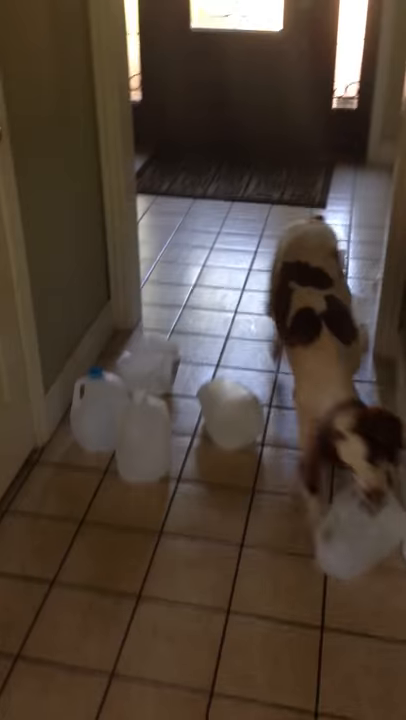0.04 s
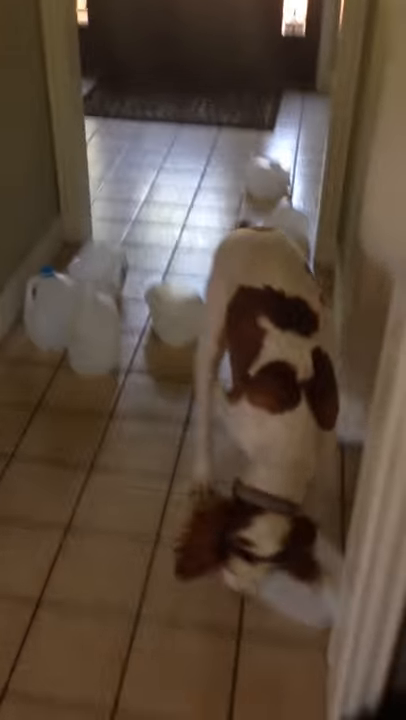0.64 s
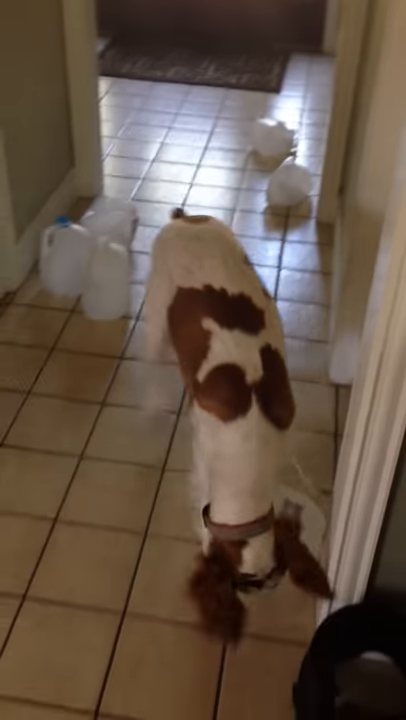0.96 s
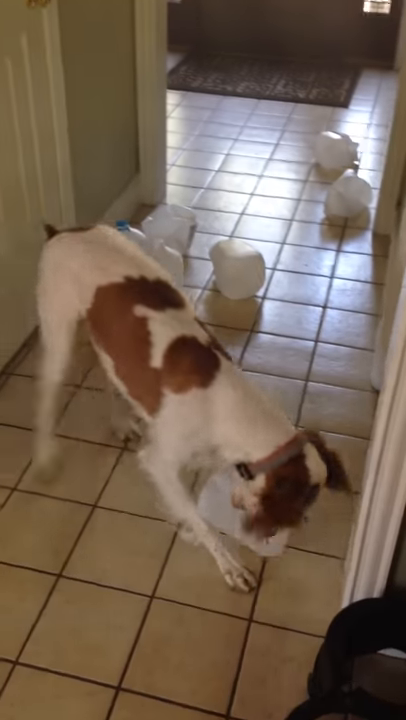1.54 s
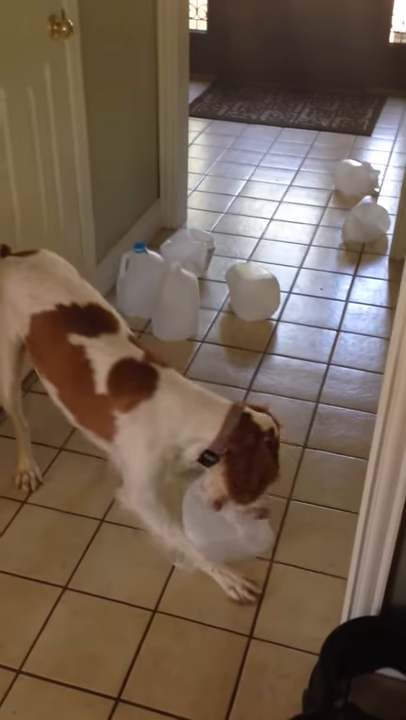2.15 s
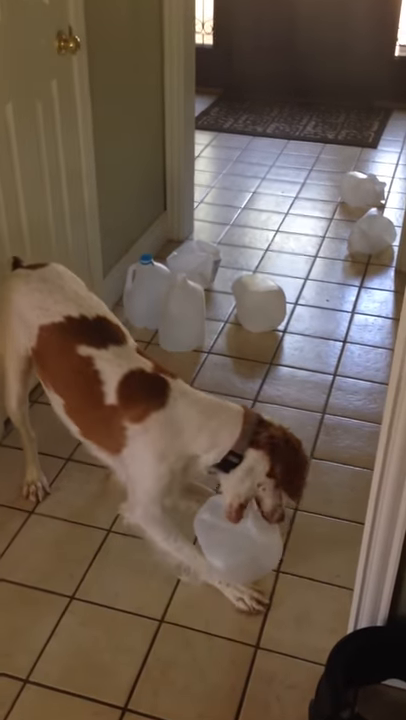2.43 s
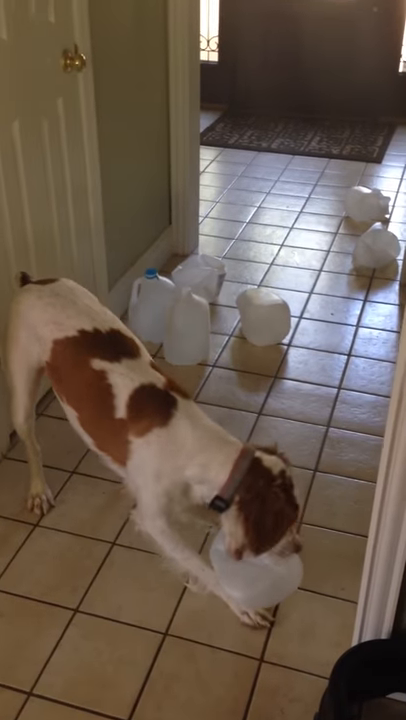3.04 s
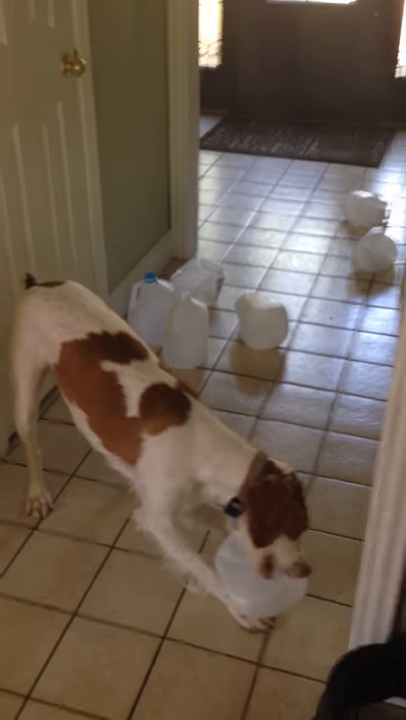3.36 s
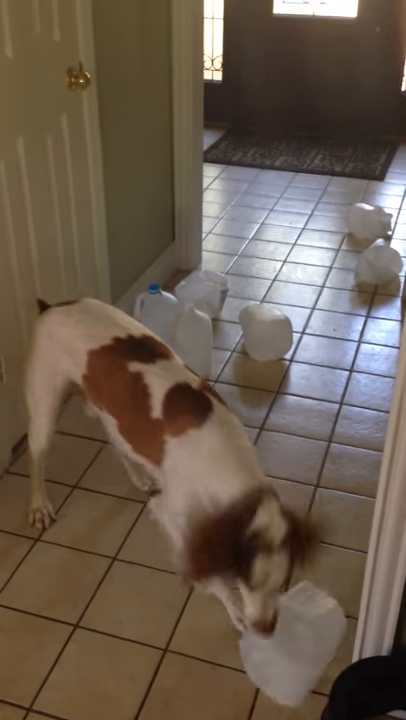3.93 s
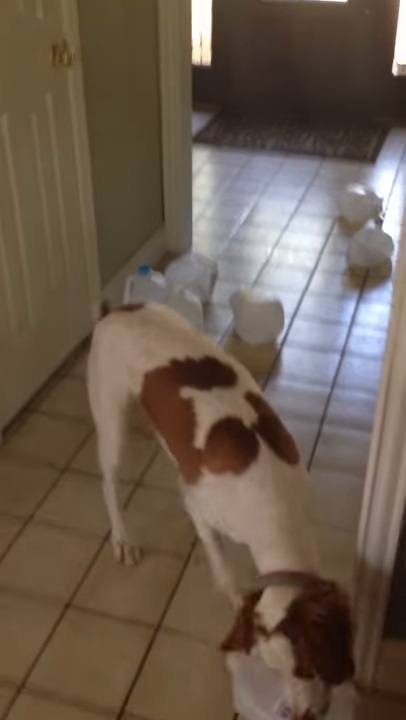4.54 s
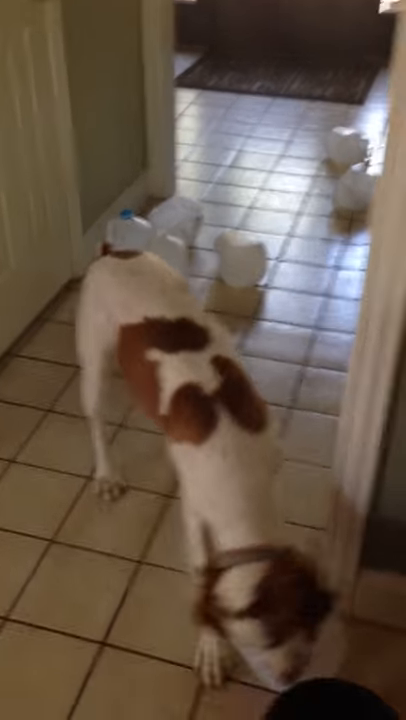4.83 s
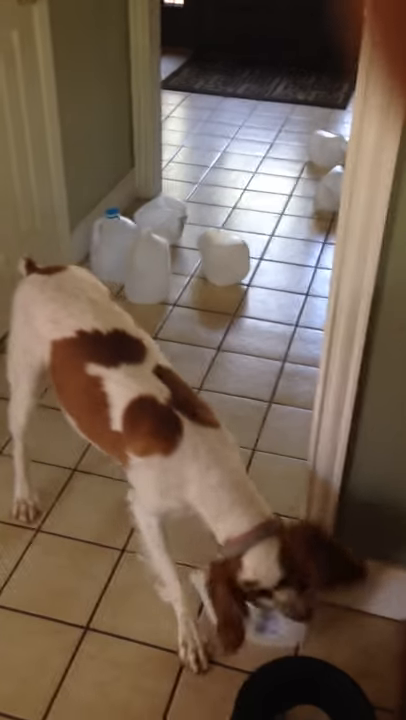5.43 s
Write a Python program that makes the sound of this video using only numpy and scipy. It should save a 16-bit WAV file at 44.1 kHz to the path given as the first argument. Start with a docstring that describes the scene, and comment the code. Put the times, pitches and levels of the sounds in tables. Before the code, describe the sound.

An empty plastic jug knocks, slides and buckles on tile as a dog pushes it around, claws ticking faintly in an echoing hallway.

```python
"""An empty plastic milk jug is nosed, pawed and chewed along a tiled hallway by a dog.
The jug thumps hollowly, clacks on floor and wall, pops where its side buckles, groans under the
wet muzzle, and judders and hisses as it slides. Claws tick on the tiles; the hard hallway rings
after every blow, over a low indoor hum."""
import sys
import numpy as np
from scipy import signal
from scipy.fft import rfft, irfft, next_fast_len
from scipy.io import wavfile
from scipy.ndimage import uniform_filter1d

SR = 44100
rng = np.random.default_rng(int(sys.argv[2]) if len(sys.argv) > 2 else 0)


def inscribe(sig):
    """Save sig as 16-bit PCM at rate SR to the path in sys.argv[1].

    A 1-D sig is mono; a 2-D sig holds one channel per row.
    Samples are clipped to [-1, 1] before scaling.
    """
    pcm = np.round(np.clip(np.atleast_2d(sig).T, -1, 1) * 32767)
    wavfile.write(sys.argv[1], SR, pcm.astype(np.int16))


N = 246519


def amp(db):
    """Decibels to gain."""
    return 10 ** (np.asarray(db) / 20)


def unit(x):
    """Scale to rms 1."""
    return x / np.sqrt(np.mean(x ** 2) + 1e-20)


def burst(x):
    """Scale a short sound to rms 1 over its loudest 10 ms."""
    return x / np.sqrt(uniform_filter1d(x ** 2, SR // 100).max() + 1e-20)


def along(points, hz):
    """Read a curve of (freq_hz, value) points on a log frequency axis."""
    freqs, values = np.transpose(points)
    return np.interp(np.log(hz + 1), np.log(freqs), values)


def coloured(x, spectrum, size=4096):
    """Minimum-phase EQ: colours a sound with no ringing ahead of its attack."""
    gain = amp(along(spectrum, np.fft.rfftfreq(size, 1 / SR)))
    cepstrum = irfft(np.log(gain))
    fold = 1 + np.sign(size // 2 - np.arange(size))
    fold[0] = 1
    impulse = irfft(np.exp(rfft(cepstrum * fold)))
    return signal.fftconvolve(x, impulse)[:len(x)]


def band(x, hz, kind):
    """Causal low-, band- or high-pass."""
    return signal.sosfilt(signal.butter(3, hz, kind, fs=SR, output="sos"), x)


def peaked(x, hz, q):
    """A broad resonance at hz."""
    return signal.lfilter(*signal.iirpeak(hz, q, SR), x)


def add(track, start_s, sound):
    """Mix a sound into the track at start_s."""
    part = track[max(round(start_s * SR), 0):][:len(sound)]
    part += sound[:len(part)]


def dying(t, t60):
    """A decay of 60 dB in t60 seconds."""
    return np.exp(-np.log(1000) * t / t60)


def stroke(start_s, length_s, attack_s, release_s, swell_db=0):
    """Envelope that rises, holds or swells for its length, then dies away."""
    age = np.arange(N) / SR - start_s
    onset = np.clip(age / attack_s, 0, 1)
    swell = amp(swell_db * (np.clip(age / length_s, 0, 1) - 1))
    return onset * swell * np.exp(-np.maximum(age - length_s, 0) / release_s)


def slips(per_s, spread_db):
    """Stick-slip: random tiny jerks of uneven size."""
    sizes = rng.choice([-1, 1], N) * amp(spread_db * np.clip(rng.standard_normal(N), -2, 2))
    return sizes * (rng.random(N) < per_s / SR)


def clicks(events, spectrum, t60, flutter_db):
    """Each click is a sudden snap and a short dense flutter, through one EQ."""
    out, t = np.zeros(N), np.arange(SR // 8) / SR
    for start_s, level_db in events:
        flutter = rng.standard_normal(len(t)) * dying(t, t60)
        snap = (t == 0) + amp(flutter_db) * flutter / np.linalg.norm(flutter)
        add(out, start_s, amp(level_db) * burst(coloured(snap, spectrum)))
    return out


def house_hum():
    """Room tone: a steady bed of low noise."""
    # hum EQ: freq_hz, level_db
    hum_eq = [(20, -72), (45, -3.5), (85, -1), (150, 4), (260, -2), (500, -25), (1000, -13.5),
              (3000, -23.5), (8000, -36.5), (15500, -42.5)]
    return amp(-47) * unit(coloured(rng.standard_normal(N), hum_eq))


def hallway(x, wet_db, walls_db):
    """Close walls throw back distinct echoes, then a diffuse ring; both change as the jug moves."""
    # the hallway's ring: freq_hz, t60_s
    ring_times = [(150, 0.46), (400, 0.38), (1000, 0.36), (2800, 0.41), (7000, 0.47), (15000, 0.28)]
    step_s, predelay_s, echo_span_s = 0.15, 0.004, 0.028
    out, t = np.zeros(N), np.arange(N) / SR
    for centre in np.arange(0, N / SR + step_s / 2, step_s):  # a fresh random reverb at each step
        hz, age, noise = signal.stft(rng.standard_normal(SR * 3 // 4), SR, nperseg=256)
        decay = amp(-60 * age / along(ring_times, hz)[:, None])
        tail = signal.istft(noise * decay, SR, nperseg=256)[1]
        echoes = np.zeros(len(tail))
        echoes[(rng.random(24) * echo_span_s * SR).astype(int)] = rng.standard_normal(24)
        impulse = amp(wet_db) * tail / np.linalg.norm(tail)
        impulse += amp(walls_db) * echoes / np.linalg.norm(echoes)
        near = abs(t - centre) < step_s
        crossfade = np.cos(np.pi / 2 * (t[near] - centre) / step_s)
        add(out, t[near][0] + predelay_s, signal.fftconvolve(x[near] * crossfade, impulse))
    return out


def claw_ticks():
    """Hard claws tap the tile: tiny, bright ticks."""
    # claw taps: start_s, level_db
    taps = [(0.941, -39), (1.6492, -41), (2.693, -50), (3.207, -43.5), (3.9168, -40), (3.9893, -44),
            (4.0494, -46.5), (4.1047, -40.5), (4.6433, -40)]
    # EQ of nail on tile: freq_hz, level_db
    nail_eq = [(500, -30), (2500, 4), (4500, 10.5), (8000, 0.5), (15500, -6)]
    return clicks(taps, nail_eq, t60=0.04, flutter_db=1)


def muzzle_groans():
    """The wet muzzle rubs a panel; the slips pile up in its main resonance until it groans."""
    # muzzle rubs: start_s, length_s, level_db
    rubs = [(3.304, 0.028, -36), (3.383, 0.06, -28.5)]
    panel_hz = 365
    press = sum(amp(db) * stroke(s, length, attack_s=0.015, release_s=0.017) for s, length, db in rubs)
    panel = peaked(slips(per_s=300, spread_db=0), panel_hz, q=5.3)
    return press * unit(peaked(panel, panel_hz, q=6.1))


def hiss_and_ticks():
    """Slips crowd into a gritty hiss that swells through a slide; the shortest bursts are ticks."""
    # hissing slides and brief bright ticks, the last being the edge of a pop: start_s, length_s, peak_db
    hisses = [(0.11, 0.0086, -32), (0.15, 0.12, -36.5), (0.287, 0.11, -40.5), (0.443, 0.0083, -29),
              (0.574, 0.011, -32), (0.646, 0.011, -33.5), (1.156, 0.086, -49.5), (1.371, 0.039, -49),
              (1.663, 0.04, -55.5), (2.206, 0.035, -46), (2.576, 0.022, -53.5), (3.779, 0.012, -34),
              (4.112, 0.029, -45), (4.169, 0.075, -36.5), (4.25, 0.11, -40), (4.345, 0.1, -34.5),
              (4.475, 0.04, -29.5), (4.715, 0.031, -45.5), (4.828, 0.06, -28), (4.997, 0.058, -37.5),
              (5.086, 0.322, -57), (5.461, 0.0092, -36)]
    # hiss EQ: freq_hz, level_db
    hiss_eq = [(400, -53), (1500, -2), (4000, 6), (7000, 1), (10000, -2.5), (15500, -11.5)]
    swells = [amp(db) * stroke(s, length, attack_s=0.0061, release_s=0.022, swell_db=6.5)
              for s, length, db in hisses]
    rub = unit(slips(per_s=7400, spread_db=0.5))
    grit = amp(-7) * unit(slips(per_s=520, spread_db=4.5))  # specks of dirt caught under the jug
    return np.max(swells, axis=0) * unit(coloured(rub + grit, hiss_eq))


def dragging():
    """Slow slips shake the hollow body, quick ones rasp the walls; the strongest push sets the level."""
    # the jug is dragged or gnawed: start_s, length_s, judder_db, scrape_db
    drags = [(0.081, 0.084, -21.5, -42), (0.203, 0.18, -35, -31), (0.364, 0.12, -38, -35),
             (0.552, 0.21, -28, -34.5), (0.8, 0.083, -28, -41.5), (0.926, 0.23, -36.5, -48.5),
             (1.2, 0.24, -40.5, -48), (1.546, 0.13, -37.5, -51), (1.843, 0.11, -44.5, -47),
             (2.247, 0.12, -45.5, -51), (2.584, 0.1, -40, -49.5), (3.007, 0.27, -40.5, -54.5),
             (3.156, 0.066, -34.5, -44.5), (3.265, 0.13, -34, -47), (3.402, 0.093, -41, -43),
             (3.678, 0.11, -43, -52), (3.798, 0.29, -45, -45.5), (3.975, 0.18, -37, -48.5),
             (4.204, 0.11, -31, -30), (4.334, 0.18, -42, -34.5), (4.429, 0.12, -28, -32.5),
             (4.617, 0.29, -45, -46.5), (4.824, 0.13, -33.5, -34), (5.0, 0.11, -45.5, -44.5),
             (5.355, 0.26, -46, -53)]
    # EQ of the shaking body: freq_hz, level_db
    judder_eq = [(50, -31), (110, -13.5), (150, 3), (200, 5), (270, 0), (380, 2), (450, -6), (560, -8.5),
                 (900, -14.5), (2000, -47.5)]
    # EQ of the rasping walls: freq_hz, level_db
    scrape_eq = [(250, -33), (600, 6.5), (1200, 4.5), (2200, 1), (4200, -8.5), (7000, -19), (15000, -34.5)]
    judder_gain, scrape_gain = amp(-51.5), 0  # the dog never quite lets go: a faint judder stays
    for start_s, length_s, judder_db, scrape_db in drags:
        push = stroke(start_s, length_s, attack_s=0.026, release_s=0.028)  # speeds up, coasts to rest
        judder_gain = np.maximum(judder_gain, amp(judder_db) * push)
        scrape_gain = np.maximum(scrape_gain, amp(scrape_db) * push)
    judder = unit(coloured(slips(per_s=380, spread_db=1), judder_eq))
    scrape = unit(coloured(slips(per_s=1500, spread_db=2), scrape_eq))
    return judder_gain * judder + scrape_gain * scrape


def buckle_pops():
    """The jug's side buckles and snaps with a sharp pop."""
    # buckles: start_s, level_db
    buckles = [(0.699, -16.5), (2.8288, -21.5), (4.243, -17.5), (5.47, -23.5)]
    # EQ of snapping plastic: freq_hz, level_db
    snap_eq = [(150, -23), (400, -2), (750, -12), (1300, -11.5), (1900, 0.5), (2700, -7), (3330, 0.5),
               (4400, -5.5), (6300, -9.5), (7600, -22), (15500, -48)]
    return clicks(buckles, snap_eq, t60=0.072, flutter_db=2)


def jug_blows(events, rise_s, crumple_t60, crumple_db):
    """Each blow rings the jug anew: the body thumps, the walls clack, edges crack, the floor thuds."""
    # modes of the air cavity and broad panels: pitch_hz, level_db, t60_s
    modes = [(152, 0, 0.12), (201, 4, 0.029), (237, -4, 0.025), (293, -6.5, 0.11), (363.7, -1.5, 0.088),
             (463, -4.5, 0.052), (570, -7, 0.0093), (780, -8.5, 0.1), (910, -25, 0.19), (1024, -16, 0.18),
             (1100, 1, 0.031), (1437, -1, 0.036), (1926, -12.5, 0.099), (2152, -16.5, 0.22)]
    thud_db, crack_db = -27.5, -10.5  # relative to the thump and to the clack
    out, t = np.zeros(N), np.arange(SR // 4) / SR
    contact = 1 - np.exp(-t / rise_s)  # the force builds as the plastic gives
    for start_s, thump_db, clack_db, thump_hz, clack_hz in events:
        detune = 1 + 0.0074 * rng.standard_normal()  # jaws and paws bend the panels
        ring = np.zeros(len(t))
        for hz, level_db, t60 in modes:
            gain = amp(level_db + 2 * rng.standard_normal())
            ring += gain * np.sin(2 * np.pi * (hz * detune * t + rng.random())) * dying(t, t60)
        blow = contact * (burst(ring) + amp(crumple_db) * crumple(t, crumple_t60))
        # the struck spot favours the modes near its own two pitches
        thump = burst(band(peaked(blow, thump_hz, q=3.73) * dying(t, 0.23), 810, "low"))
        clack = burst(band(blow + amp(6.5) * peaked(blow, clack_hz, q=4.5), [550, 2800], "band"))
        crack = burst(band(blow * dying(t, 0.11), 2770, "high"))
        thud = burst(band(rng.standard_normal(len(t)) * dying(t, 0.11), 79, "low"))
        add(out, start_s, amp(thump_db) * (thump + amp(thud_db) * thud))
        add(out, start_s, amp(clack_db) * (clack + amp(crack_db) * crack))
    return out


def crumple(t, t60):
    """The countless close modes of thin plastic blur into a burst of noise."""
    # EQ of thin plastic: freq_hz, level_db
    plastic_eq = [(60, -55), (150, -3), (400, 1), (650, -2.5), (1300, -3), (2400, -6), (4400, -14.5),
                  (6500, -28.5), (10000, -40), (15500, -67)]
    return burst(coloured(rng.standard_normal(len(t)) * dying(t, t60), plastic_eq))


def paw_bumps():
    """Soft paws stir the hollow body and barely wake the clack."""
    # paw hits: start_s, thump_db, thump_hz
    bumps = [(0.385, -23, 210), (0.971, -27.5, 197), (0.993, -23.5, 216), (1.02, -45, 205),
             (1.09, -25.5, 249), (1.364, -31.5, 332), (1.488, -18.5, 196), (1.93, -35.5, 361),
             (2.595, -25, 172), (2.69, -28.5, 386), (3.186, -30, 440), (3.205, -24.5, 237),
             (3.918, -33.5, 293), (4.003, -27, 219), (4.08, -28, 202), (4.523, -18, 278), (4.549, -22, 333),
             (4.644, -35, 300), (5.274, -33, 357), (5.346, -28, 273), (5.493, -23.5, 228)]
    clack_offset_db, clack_hz = -19.5, 710
    hits = [(s, db, db + clack_offset_db, hz, clack_hz) for s, db, hz in bumps]
    return jug_blows(hits, rise_s=0.00074, crumple_t60=0.046, crumple_db=8)


def muzzle_shoves():
    """The muzzle presses in and crumples the jug: blows with a soft attack."""
    # shoves: start_s, thump_db, clack_db, thump_hz, clack_hz
    shoves = [(0.086, -28, -31, 158, 665), (0.116, -21, -26, 185, 606), (0.158, -18.5, -23, 460, 1030),
              (0.181, -13.5, -24, 405, 600), (0.231, -21, -23, 413, 1220), (0.446, -27.5, -21.5, 342, 1220),
              (0.488, -18, -23, 456, 680), (0.576, -34, -31.5, 310, 1530), (0.711, -24, -23.5, 467, 840),
              (1.261, -38, -27.5, 227, 1050), (1.538, -21, -29.5, 208, 900), (2.225, -25.5, -26, 205, 1000),
              (2.57, -24, -36.5, 369, 890), (3.29, -30.5, -43, 374, 2080), (3.443, -47, -38.5, 375, 890),
              (3.787, -31, -23, 248, 1960), (4.181, -23, -27.5, 350, 750), (4.496, -24.5, -24.5, 289, 2020)]
    return jug_blows(shoves, rise_s=0.0061, crumple_t60=0.12, crumple_db=-1)


def jug_knocks():
    """The jug strikes tile or wall: a hollow thump with a hard clack."""
    # knocks: start_s, thump_db, clack_db, thump_hz, clack_hz
    knocks = [(0.256, -13.5, -14.5, 383, 1230), (0.465, -13, -20, 216, 645), (0.651, -18, -20.5, 213, 590),
              (0.697, -25, -17, 360, 850), (0.846, -23.5, -27.5, 199, 780), (1.648, -27.5, -36, 154, 1080),
              (1.809, -27.5, -30, 407, 1350), (3.052, -67.5, -44, 236, 1020), (3.425, -55, -35, 360, 1830),
              (3.763, -21, -20.5, 298, 860), (4.161, -21, -27, 270, 1650), (4.242, -18, -18.5, 353, 1570),
              (4.727, -23, -19.5, 332, 1090), (4.827, -21.5, -27.5, 383, 806), (4.914, -19, -20, 416, 1660)]
    return jug_blows(knocks, rise_s=0.0021, crumple_t60=0.11, crumple_db=-0.5)


def scene():
    """Jug and claws in the hallway, over the hum of the house."""
    hits = jug_knocks() + muzzle_shoves() + paw_bumps() + buckle_pops() + claw_ticks()
    direct = hits + dragging() + hiss_and_ticks() + muzzle_groans()
    return (house_hum() + direct + hallway(direct, wet_db=-7, walls_db=-15.5))[None]


def record(dry):
    """The sound cuts in after a moment of silence; a brick-wall low-pass trims the very top."""
    start_s, top_hz = 0.085, 15700
    gated = dry * (np.arange(N) / SR > start_s)
    size = next_fast_len(N + SR // 2)
    passband = np.fft.rfftfreq(size, 1 / SR) < top_hz
    return irfft(rfft(gated, size) * passband, size)[:, :N]


dry = scene()
out = record(dry)
inscribe(out)
```